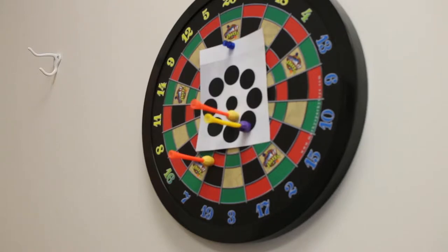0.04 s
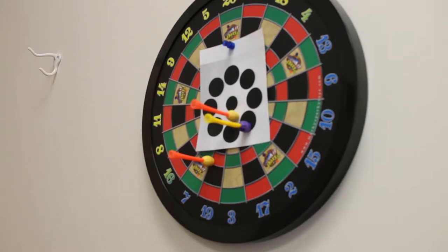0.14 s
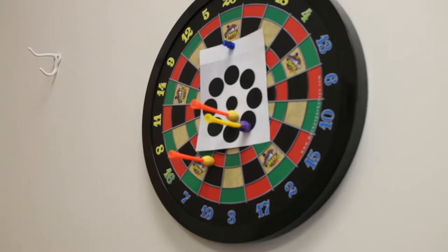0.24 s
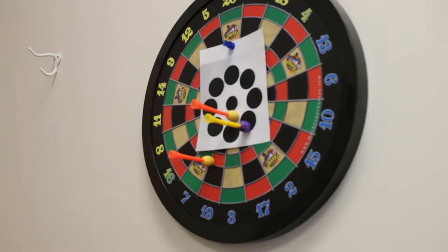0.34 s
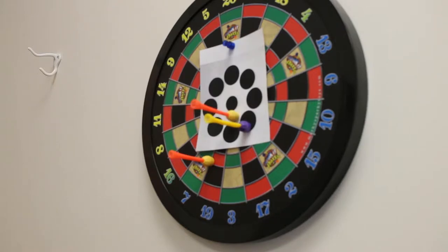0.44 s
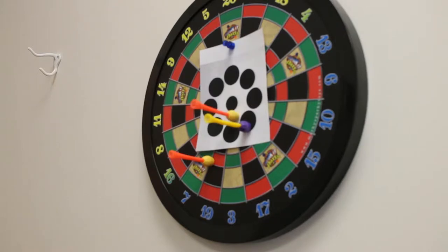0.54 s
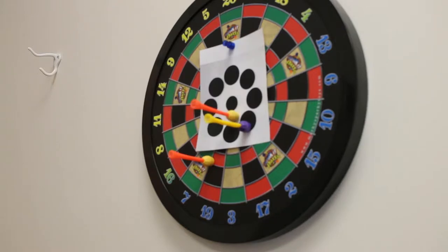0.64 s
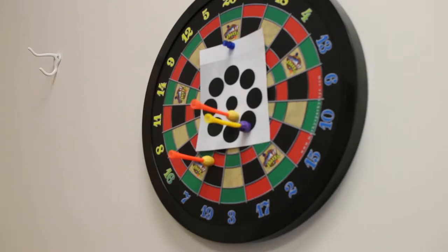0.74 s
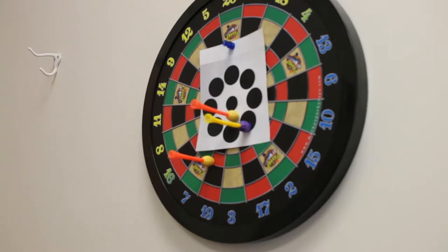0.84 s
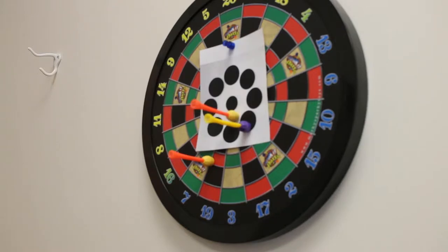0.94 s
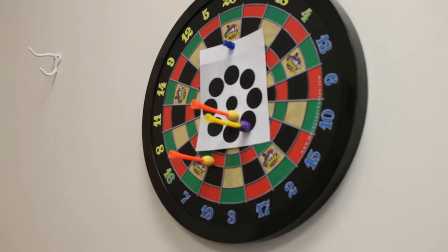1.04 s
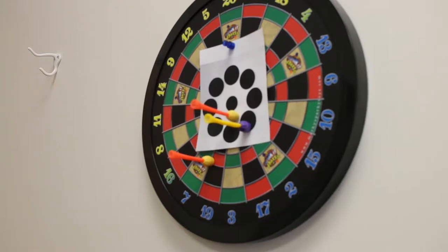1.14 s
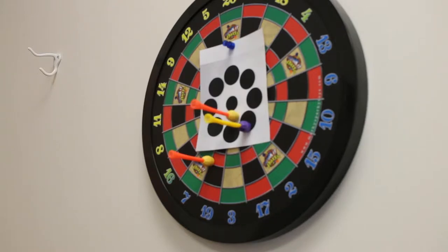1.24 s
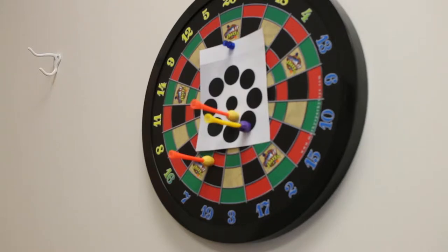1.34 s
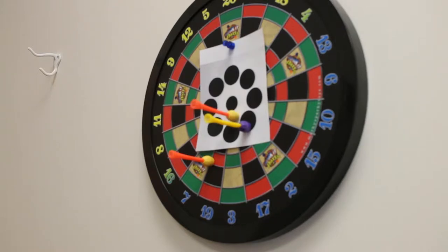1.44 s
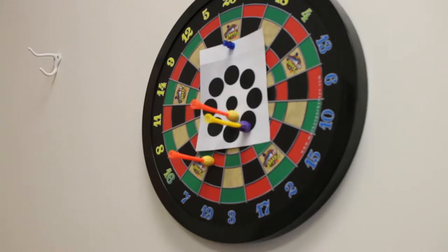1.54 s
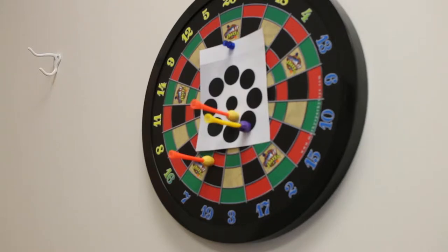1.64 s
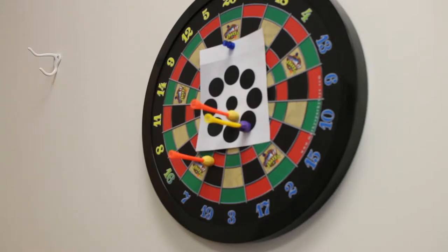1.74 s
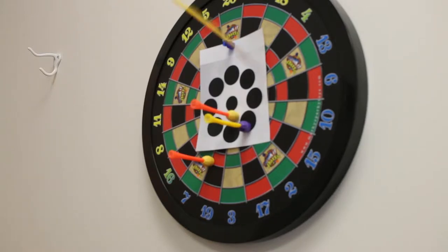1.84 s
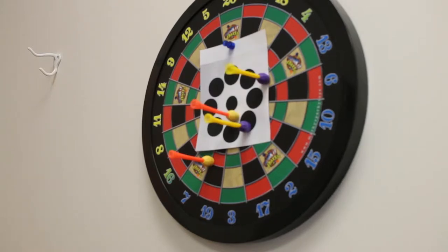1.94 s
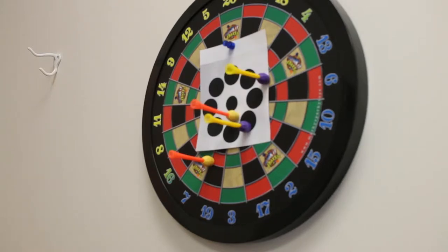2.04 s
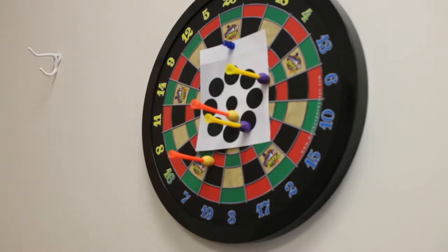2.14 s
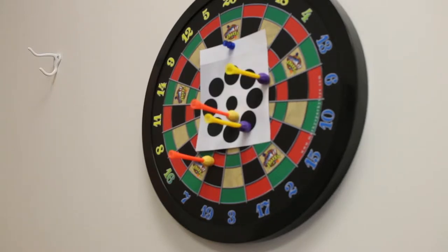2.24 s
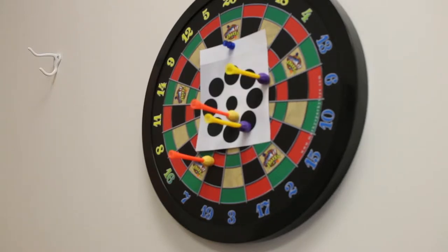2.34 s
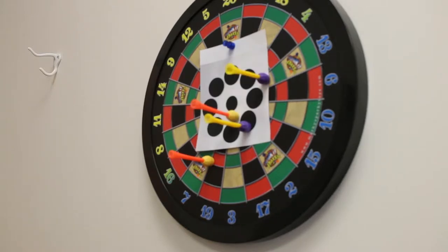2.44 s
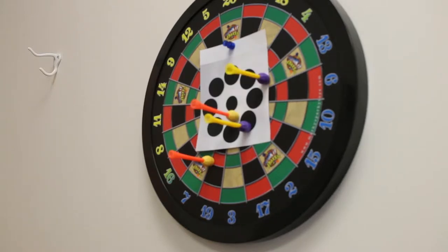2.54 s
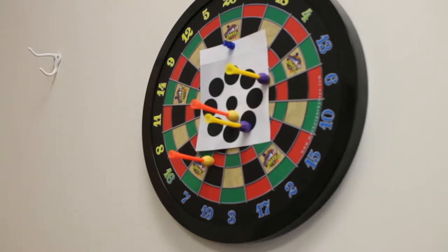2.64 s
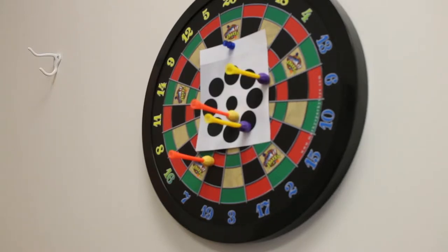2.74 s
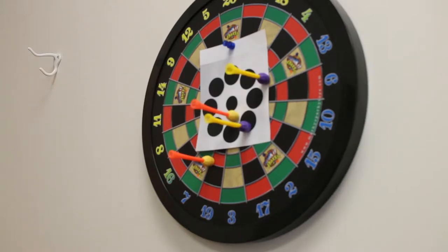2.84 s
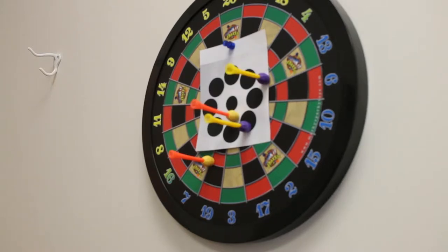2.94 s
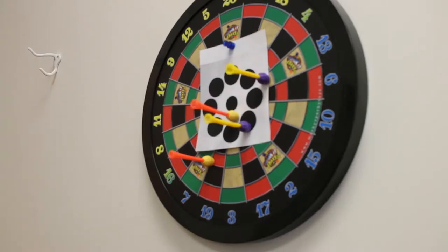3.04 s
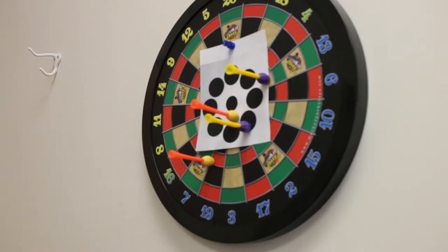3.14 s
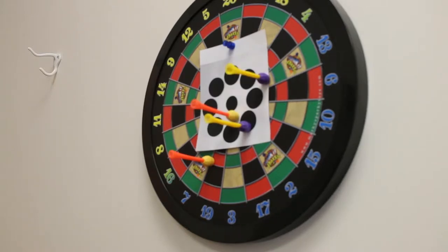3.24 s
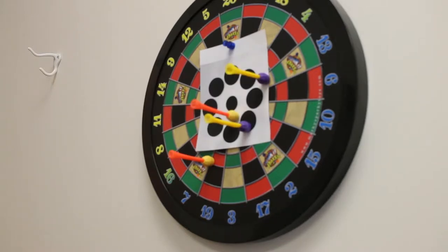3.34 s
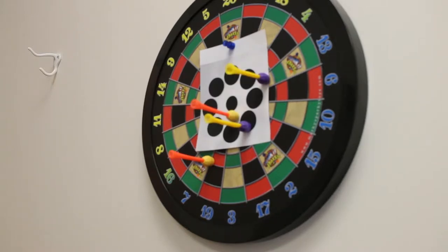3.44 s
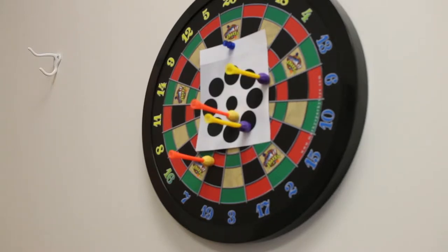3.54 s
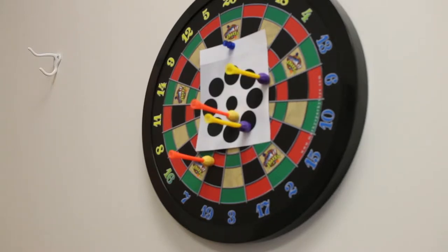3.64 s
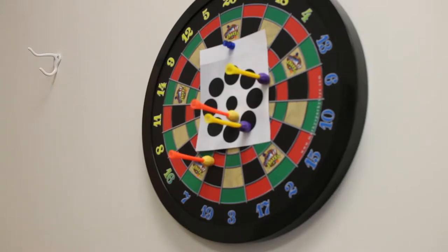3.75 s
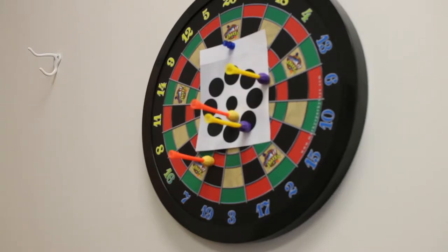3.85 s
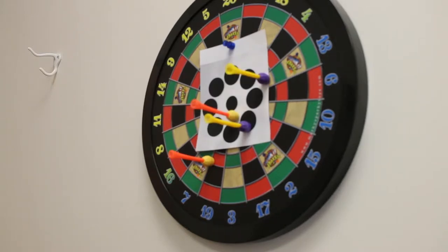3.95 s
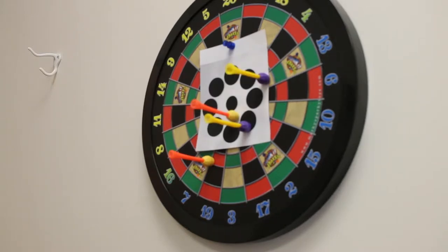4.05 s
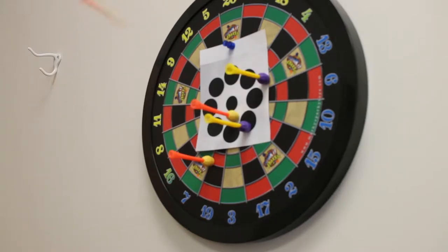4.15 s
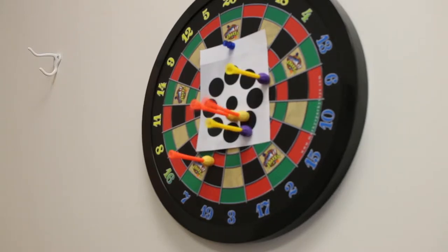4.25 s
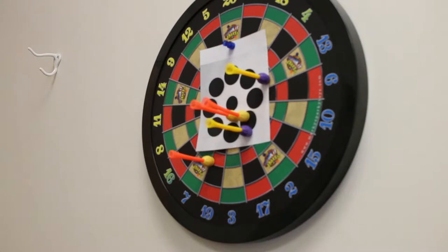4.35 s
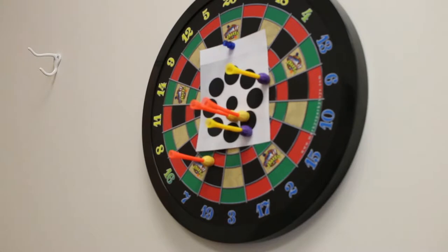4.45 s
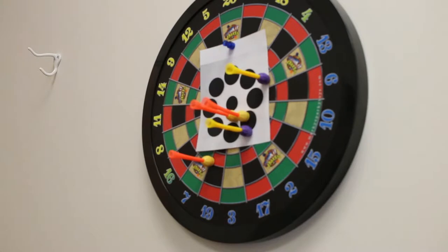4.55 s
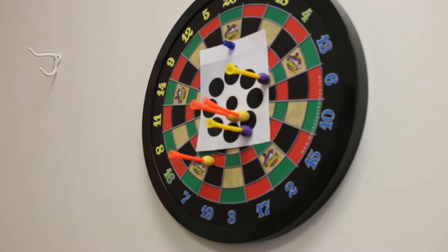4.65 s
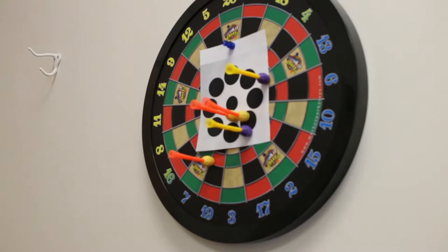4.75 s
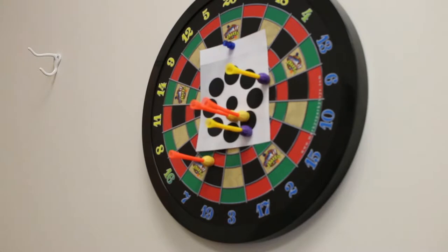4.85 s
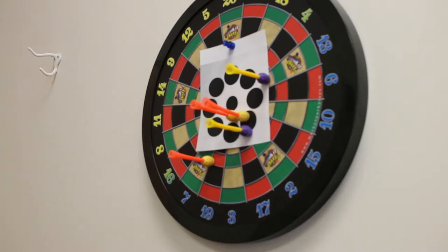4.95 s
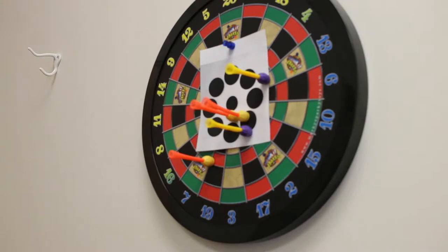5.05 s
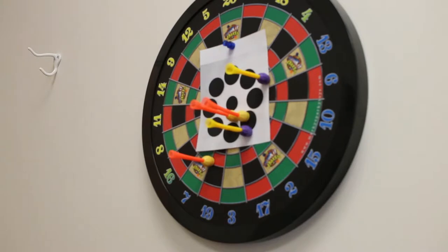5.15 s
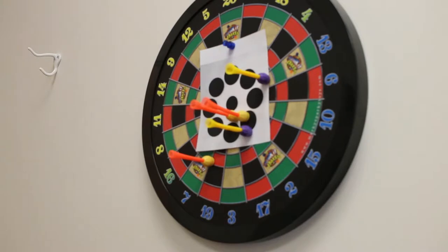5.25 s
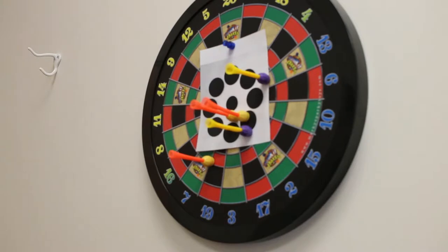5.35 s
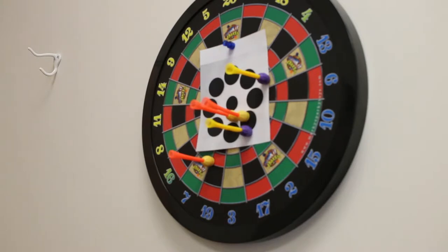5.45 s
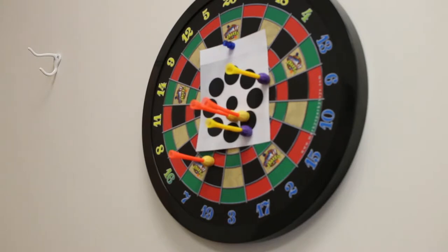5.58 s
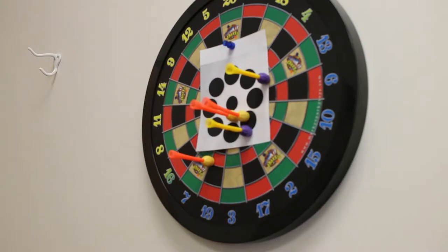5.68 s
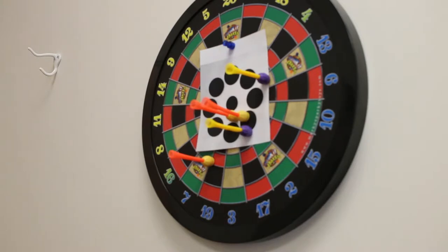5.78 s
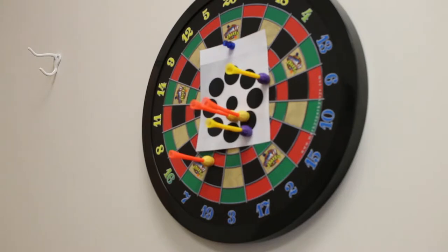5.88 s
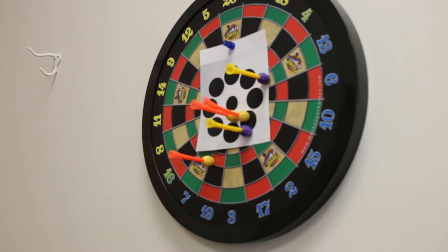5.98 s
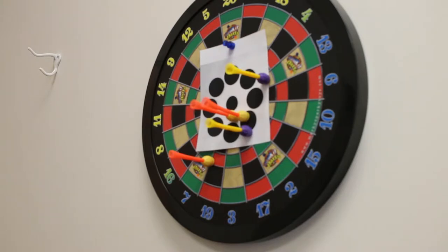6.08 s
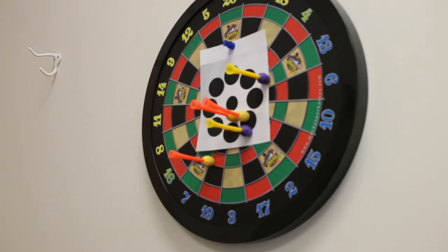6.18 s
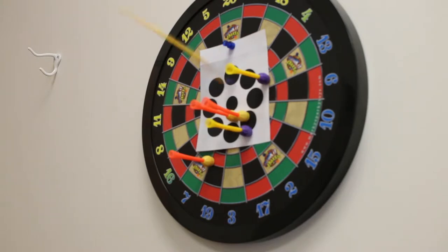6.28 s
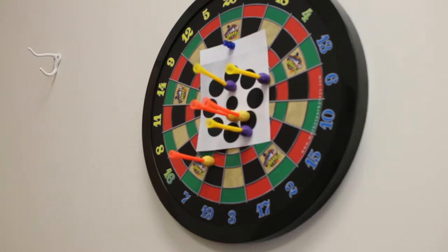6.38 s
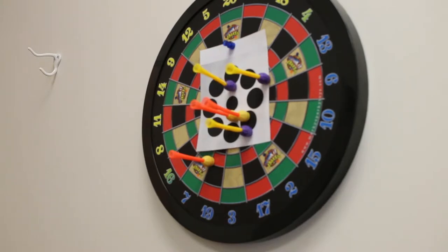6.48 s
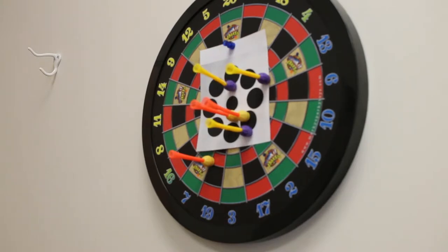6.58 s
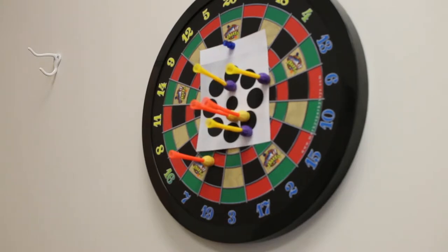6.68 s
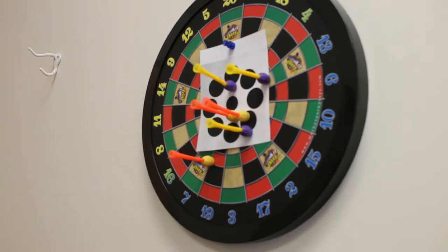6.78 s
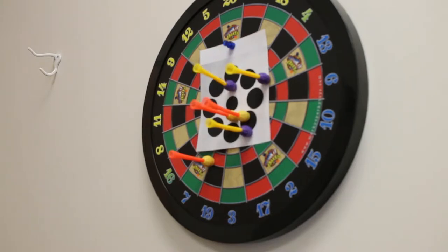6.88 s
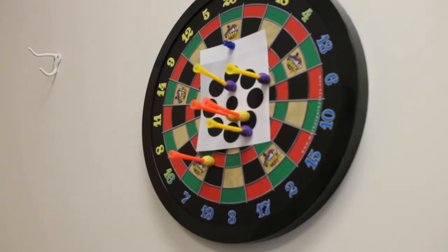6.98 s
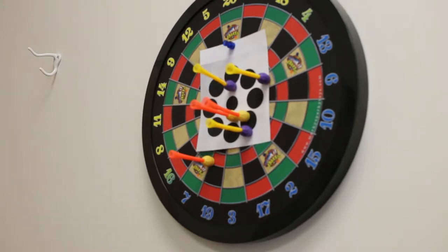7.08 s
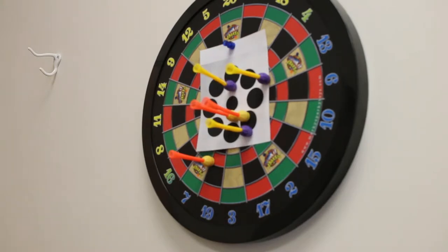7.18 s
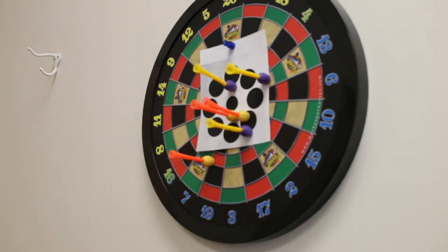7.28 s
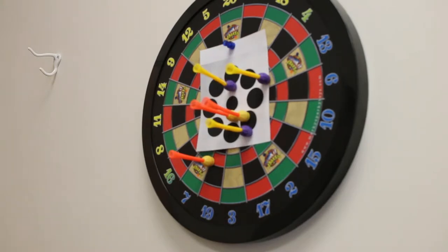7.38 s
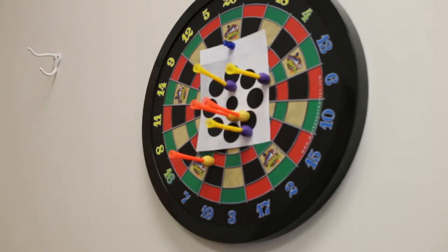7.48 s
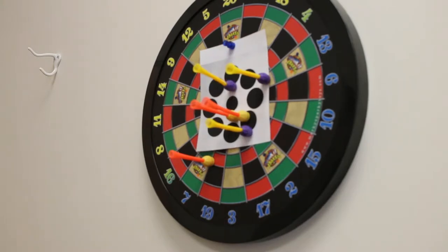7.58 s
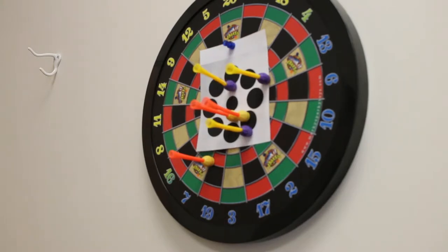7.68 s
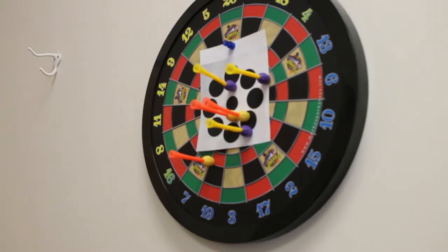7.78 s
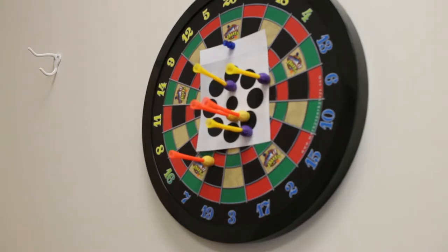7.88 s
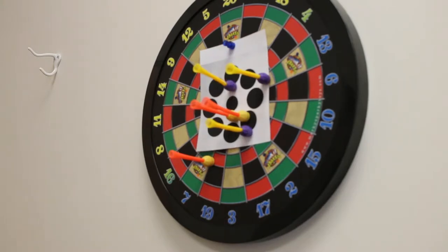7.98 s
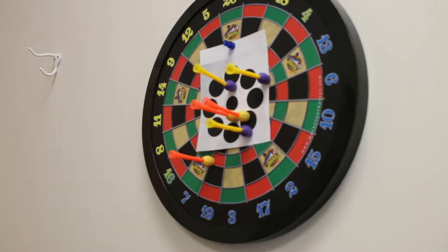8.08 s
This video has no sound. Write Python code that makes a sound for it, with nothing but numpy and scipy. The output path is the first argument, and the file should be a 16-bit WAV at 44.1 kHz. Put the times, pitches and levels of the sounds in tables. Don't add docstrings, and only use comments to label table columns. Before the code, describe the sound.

In a rumbling, faintly hissing room, three darts slap a metal dartboard one by one, with soft clothing rustle and shoe scuffs between.

```python
import sys
import numpy as np
from scipy import signal
from scipy.fft import rfft, irfft, next_fast_len
from scipy.io import wavfile
from scipy.ndimage import uniform_filter1d

SR = 44100
rng = np.random.default_rng(int(sys.argv[2]) if len(sys.argv) > 2 else 0)


def gain_from_decibels(decibels):
    exponent = np.asarray(decibels, float) / 20
    return 10 ** exponent


def materialize(psi):
    bounded = np.clip(np.atleast_2d(psi).T, -1, 1)
    quanta = np.round(bounded * 32767).astype(np.int16)
    wavfile.write(sys.argv[1], SR, quanta)


N = 358091


def unit(x):
    return x / np.sqrt(np.mean(x ** 2))


def noise(*shape):
    return rng.standard_normal(shape)


def colour(x, points):
    hz, db = np.transpose(points)
    size = next_fast_len(len(x))
    f = np.maximum(np.arange(size // 2 + 1) * SR / size, 1)
    gain = gain_from_decibels(np.interp(np.log(f), np.log(hz), db))
    return irfft(rfft(x, size) * gain, size)[:len(x)]


def band(x, lo_hz, hi_hz):
    return signal.sosfilt(signal.butter(2, [lo_hz, hi_hz], "bandpass", fs=SR, output="sos"), x)


def high_pass(order, hz):
    return signal.butter(order, hz, "highpass", fs=SR, output="sos")


def ring(x, hz, t60):
    pole = np.exp(2j * np.pi * hz / SR - np.log(1000) / (t60 * SR))
    return signal.lfilter([1], [1, -pole], x + 0j).imag


def walk(rate):
    k = int(SR / rate)
    held = np.repeat(noise(N // k + 1), k)
    return unit(uniform_filter1d(uniform_filter1d(held, k), k)[:N])


# pitch in Hz, level in dB per Hz.
AIR_TONE = [(12, -48), (20, -0.5), (77, -3), (177, -4.5), (210, -2), (234, -13.5), (277, -7), (357, -18.5),
            (472, -21), (738, -24), (897, -27), (1480, -28.5), (2460, -33), (13500, -36), (16000, -36)]
# pitch in Hz, level in dB.
MOTOR_HUM = [(91.5, -72), (204.6, -60), (323.0, -64), (479.1, -65.5)]
# pitch in Hz, difference against shared sound in dB.
QUIET_PORTS = [(60, -26), (110, -35), (200, -36), (380, -16.5), (700, -9.5), (1290, -9), (2380, -2),
               (4400, 0), (8120, -1.5), (15000, 0.5)]


def air():
    level = gain_from_decibels(-51)
    mid = unit(colour(noise(N), AIR_TONE))
    side = colour(unit(colour(noise(N), AIR_TONE)), QUIET_PORTS)
    swell = gain_from_decibels(1.0 * walk(3.0)) * band(mid, 25, 210)
    mid = level * (mid + 0.25 * swell)
    for hz, db in MOTOR_HUM:
        mid += gain_from_decibels(db - 9.5) * unit(ring(noise(N), hz, 0.59))
    return np.array([mid, level * side])


# peak in seconds, length in seconds, level in dB, brightness in dB.
MOVEMENTS = [(0.01, 0.39, -59, -5), (0.275, .04, -58, 6), (0.428, 0.068, -61, -9),
             (0.505, 0.015, -51.5, -11), (0.533, 0.062, -51, -6), (1.56, 0.23, -61, -1.5),
             (1.736, 0.19, -63, 1.5), (2.57, 0.18, -60, -3.5), (3.77, .06, -70, 5), (3.947, 0.14, -64, -2),
             (4.053, .08, -59, 1), (4.79, 0.18, -62, -2.5), (5.1, 0.34, -62.5, -1.5),
             (5.383, 0.089, -69, 0), (6.108, 0.29, -61, -0.5), (6.954, 0.069, -50.5, -7),
             (7.054, 0.17, -53, 1.5), (7.169, 0.056, -48, -2.5), (7.27, 0.15, -58, -1),
             (7.57, 0.13, -50.5, 1.5), (7.61, .05, -56, 1), (7.745, 0.39, -53.5, -1),
             (7.845, 0.021, -50, 2.5), (7.95, 0.11, -54, 0), (8.049, 0.038, -44.5, 0.5)]
# lowest Hz, highest Hz, level in dB, dB gained per dB of brightness.
CLOTH_BANDS = [(766.5, 2200, 0, 0), (2166, 4800, -4.5, 0.76), (4753, 11000, -15, 2.36),
               (322, 740, -6, -0.95)]


def rustle():
    rise_share, fall_share = 0.64, 0.87
    t = np.arange(N) / SR
    grains = noise(4, N) * gain_from_decibels(1.0 * walk(40) + 1.2 * walk(300))
    power = np.zeros((4, N))
    for s, length, db, bright_db in MOVEMENTS:
        share = np.where(t < s, rise_share, fall_share)
        shape = np.exp(-2 * np.abs(t - s) / (length * share))
        power += shape * gain_from_decibels([[2 * (db + base_db + slope * bright_db)] for *_, base_db, slope in CLOTH_BANDS])
    out = np.zeros(N)
    for p, grain, (lo_hz, hi_hz, *_) in zip(power, grains, CLOTH_BANDS):
        out += gain_from_decibels(-3.0) * np.sqrt(p) * unit(band(grain, lo_hz, hi_hz))
    return out


# start in seconds, level in dB, rise in seconds, fall in seconds, highest Hz.
FOOTFALLS = [
    (0.499, -39, 0.036, 0.064, 374),
    (6.9, -47, 0.045, 0.084, 300),
    (8.019, -47, 0.016, 0.07, 300),
]


def footfalls():
    out, late = np.zeros(N), np.arange(SR) / SR
    for s, db, rise, fall, top_hz in FOOTFALLS:
        shape = (1 - np.exp(-late / rise)) * np.exp(-late / fall)
        thump = shape * unit(band(noise(SR), 94, top_hz))
        i = int(s * SR)
        out[i:i + SR] += gain_from_decibels(db - 1.0) * thump[:N - i]
    return out


# start in seconds, length in seconds, level in dB, first pitch in Hz, last pitch in Hz.
SOLE_DRAGS = [
    (0.537, 0.1, -54, 469, 504),
    (6.9, 0.093, -57.5, 1008, 1380),
    (7.118, 0.12, -54, 605, 992),
    (7.68, 0.48, -59, 1298, 1805),
]


def drags():
    width = 0.12
    out = np.zeros(N)
    for s, length, db, from_hz, to_hz in SOLE_DRAGS:
        u = np.clip(np.arange(SR // 2) / SR / length, 0, 1)
        slow = signal.butter(2, width * to_hz, fs=SR, output="sos")
        flutter = unit(signal.sosfilt(slow, noise(2, len(u))))
        turn = 2 * np.pi * np.cumsum(from_hz + (to_hz - from_hz) * u) / SR
        tone = flutter[0] * np.cos(turn) + flutter[1] * np.sin(turn)
        i = int(s * SR)
        out[i:i + len(u)] += (gain_from_decibels(db) * np.sin(np.pi * u) * tone)[:N - i]
    return out


# time in seconds, level in dB, pitch in Hz, seconds to fall 60 dB.
TICKS = [
    (0.9575, -28.5, 1350, 0.0046),
    (7.851, -38.5, 1290, 0.014),
    (8.027, -48, 1200, .004),
]


def tick():
    out = np.zeros(N)
    for s, db, hz, t60 in TICKS:
        push = np.zeros(N)
        push[int(s * SR)] = -gain_from_decibels(db)
        out += band(ring(push, hz, t60), 620, 4400)
    return out


LANDINGS = [
    1.9302,
    4.2805,
    6.3635,
]
# blow in dB, magnet chatter before it in ms, crack in dB, drop of the camera's gain in dB.
THROWS = [
    (13, 1.0, -21.5, 13),
    (13.5, .12, -16, 13),
    (16.5, .12, -18.5, 13.5),
]
# pitch in Hz, seconds to fall 60 dB, level in dB for each of the three darts.
BOARD_TONES = [(135.2, 0.21, -17.5, -21, -17), (205, 0.15, -25.5, -19.5, -20.5),
               (445, 0.16, -19.5, -18, -33), (318, 0.017, -12, -18, -15.5), (458, 0.017, 1.5, -7, -9),
               (600, 0.0097, -5, -7, -2.5), (814, 0.0088, -3, -14.5, -5), (1022, 0.0077, 0.5, 2, -3.5),
               (1348, 0.014, -4.5, -7.5, -7.5), (1593, 0.015, -4, -5, -6.5), (1876, 0.015, -11, -3, -15),
               (2360, 0.011, -5.5, -10.5, -8.5), (2827, 0.021, -15.5, -15.5, -16.5),
               (3360, 0.02, -18.5, -11, -13.5), (3920, 0.0081, -10.5, -10, -16.5),
               (5810, 0.0062, -15, -10.5, -20), (7300, .006, -12, -14.5, -17)]


def darts():
    contact_ms, rebound_after_ms, rebound_ms = 0.24, 0.4, 0.9
    out, slaps, t = np.zeros(N), np.zeros(N), np.arange(SR // 4) / SR
    push = np.sin(np.pi * np.clip(t * 1000 / contact_ms, 0, 1))
    push = push / push.sum()
    rebound = np.sin(np.pi * np.clip((t * 1000 - rebound_after_ms) / rebound_ms, 0, 1)) ** 0.5
    for k, (s, (blow_db, lead_ms, crack_db, _)) in enumerate(zip(LANDINGS, THROWS)):
        body = gain_from_decibels(-0.5) * rebound
        for hz, t60, *dart_db in BOARD_TONES:
            body -= gain_from_decibels(dart_db[k]) * ring(push, hz, t60)
        fade = np.exp(-t / 0.0011) + gain_from_decibels(-15.0) * np.exp(-t / 0.0054)
        crack = gain_from_decibels(crack_db) * unit(band(noise(len(t)), 2100, 11000)) * fade
        chatter = gain_from_decibels(-25) * unit(band(noise(len(t)), 2500, 13000))
        i, lead = int(s * SR), int(lead_ms * SR / 1000)
        out[i:i + len(t)] += gain_from_decibels(blow_db) * (body + crack)
        out[i - lead:i] += gain_from_decibels(blow_db) * chatter[-lead:]
        slaps[i] = gain_from_decibels(blow_db + 15)
    out = signal.sosfilt(high_pass(2, 400), out)
    return signal.sosfiltfilt(high_pass(1, 110), out), slaps


# pitch in Hz, seconds to fall 60 dB, level in dB.
ROOM_RING = [(100, 0.81, -59.5), (188, 0.87, -44.5), (300, 0.75, -43), (433, 0.45, -32), (530, 0.45, -31),
             (750, 0.41, -38.5), (1100, 0.57, -46.5), (1870, .48, -46), (3000, 0.5, -42.5),
             (4267, 0.49, -45.5), (5300, 0.37, -49.5), (7000, 0.38, -55.5), (9400, 0.3, -59),
             (14000, .2, -65.5)]
# pitch in Hz, difference against shared sound in dB.
RING_PORTS = [(60, -46.5), (110, -58), (200, -69.5), (380, -75), (700, -54.5), (1290, -50), (2380, -29),
              (4400, -33), (8120, -11.5), (15000, -10)]
# delay in ms, level in dB.
FIRST_ECHOES = [(5.5, -19), (8.5, -22), (10.2, -25.5), (12.5, -22), (13.4, -28), (14.5, -26)]


def room(x, slaps):
    t = np.arange(SR) / SR
    hz, t60, db = np.transpose(ROOM_RING)
    tail, early = np.zeros((2, len(t))), np.zeros(2048)
    half_band = 2 ** (1 / 10)
    for f in 70 * 2 ** np.arange(0, 8, 1 / 5):
        start_db = np.interp(np.log(f), np.log(hz), db)
        fade = gain_from_decibels(start_db - 60 * t / np.interp(np.log(f), np.log(hz), t60))
        tail += fade * band(noise(2, len(t)), f / half_band, f * half_band)
    tail *= 1 - np.exp(-t / 0.0013)
    tail[1] = colour(tail[1], RING_PORTS)
    for ms, echo_db in FIRST_ECHOES:
        early[int(ms * SR / 1000)] = gain_from_decibels(echo_db)
    out = signal.fftconvolve((gain_from_decibels(-9) * x + slaps)[None], tail, axes=1)[:, :N]
    out[0] += signal.fftconvolve(x, band(early, 100, 11000))[:N]
    return out


def scene():
    blows, slaps = darts()
    cloth = rustle() + footfalls()
    mid, side = room(blows + gain_from_decibels(-2.5) * cloth, slaps) + air()
    mid = mid + blows + cloth + tick() + drags()
    return np.array([mid + side, mid - side])


def top_cut(x):
    return signal.sosfilt(signal.butter(12, 15790, fs=SR, output="sos"), x)


def record(dry):
    hold_s, release_s = 0.0025, 0.16
    t, duck_db = np.arange(N) / SR, np.zeros(N)
    for s, (*_, depth_db) in zip(LANDINGS, THROWS):
        fall = 1 - np.exp(-np.maximum(t - s, 0) / 0.0028)
        duck_db += depth_db * fall * np.clip(1 - (t - s - hold_s) / release_s, 0, 1)
    converter_hiss = gain_from_decibels(-71) * noise(*dry.shape)
    x = gain_from_decibels(2.5) * (dry * gain_from_decibels(-duck_db) + converter_hiss)
    x = signal.sosfilt(high_pass(2, 36), x)
    low_cut = high_pass(1, 82)
    for stage in range(2):
        clipped_off = x - np.clip(x, -1, 1)
        x = x - signal.sosfilt(low_cut, clipped_off)
    return top_cut(np.clip(x, -1, 1))


dry = scene()
out = record(dry)
materialize(out)
```